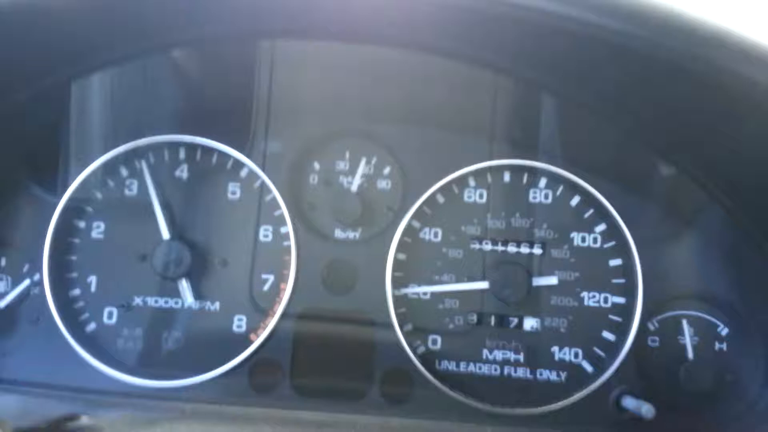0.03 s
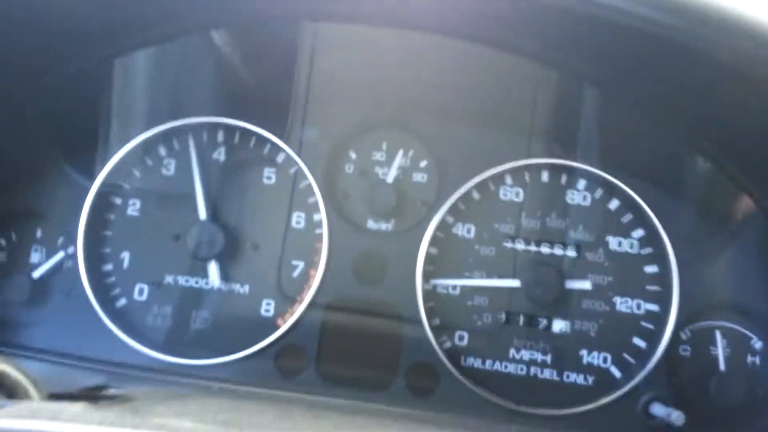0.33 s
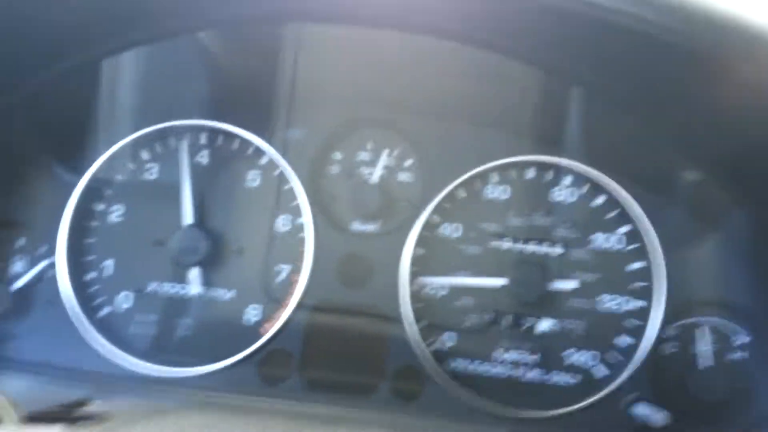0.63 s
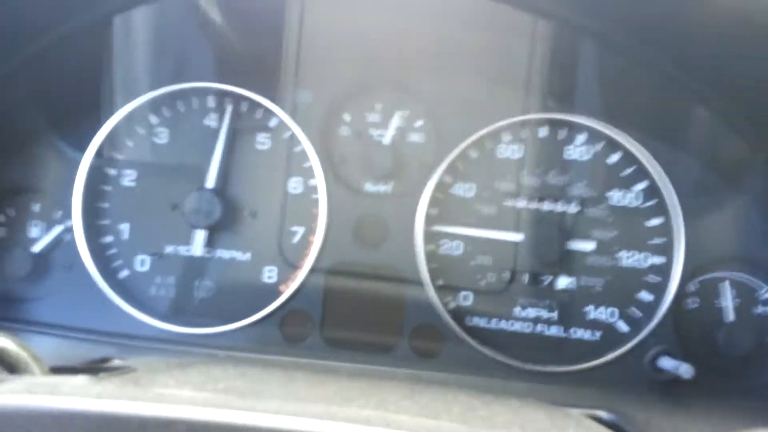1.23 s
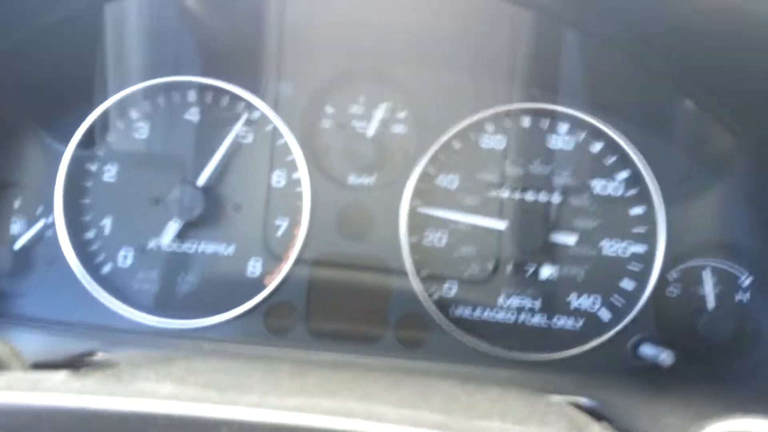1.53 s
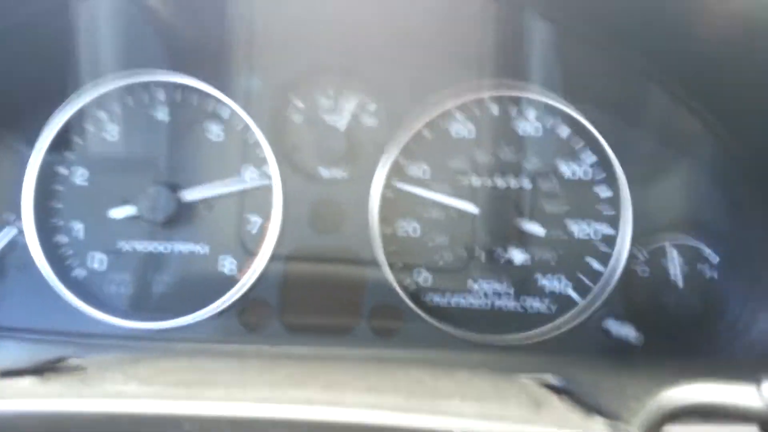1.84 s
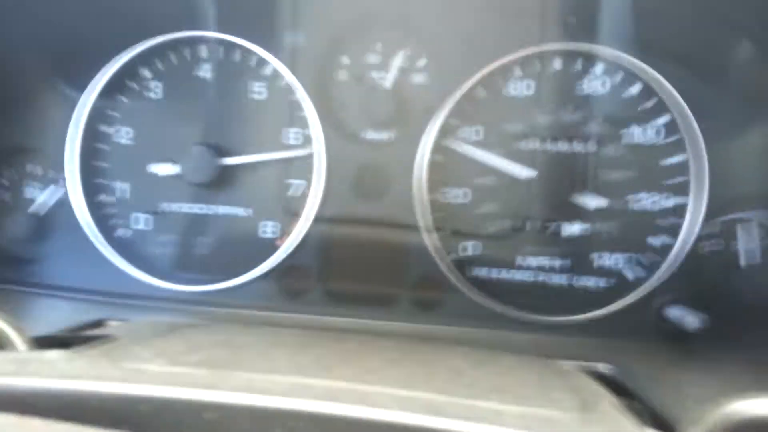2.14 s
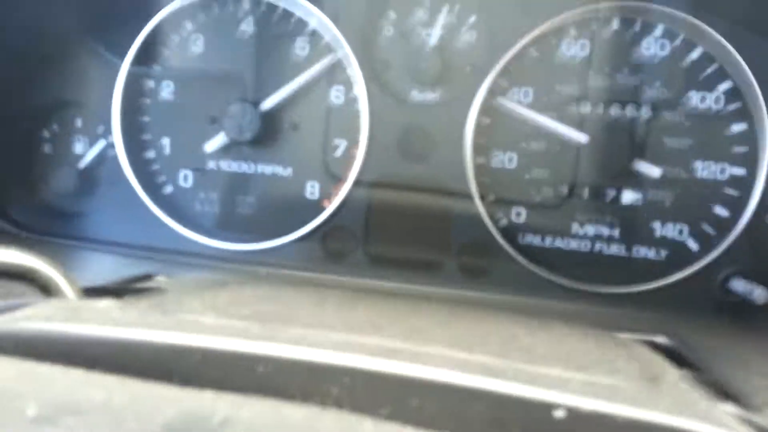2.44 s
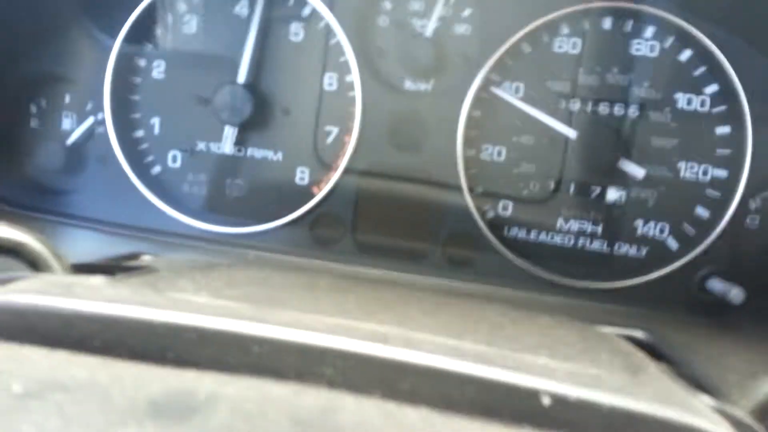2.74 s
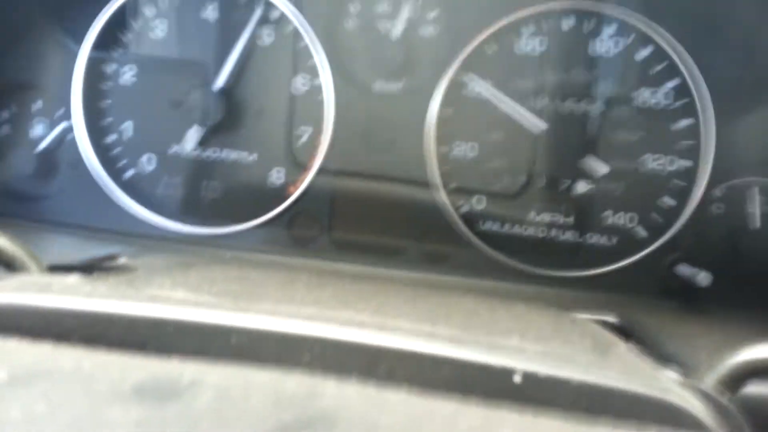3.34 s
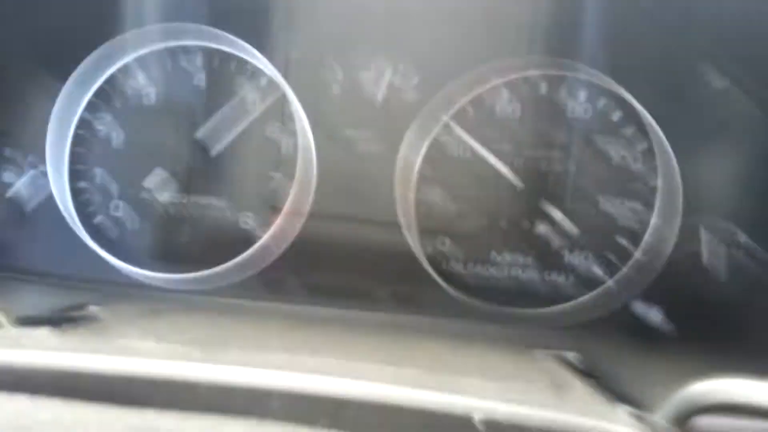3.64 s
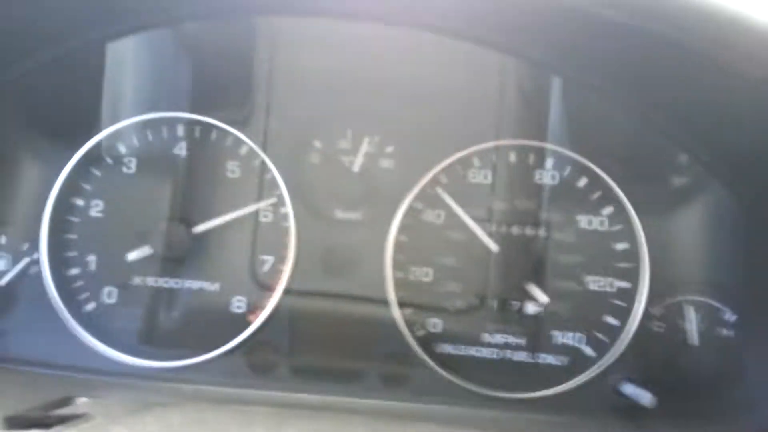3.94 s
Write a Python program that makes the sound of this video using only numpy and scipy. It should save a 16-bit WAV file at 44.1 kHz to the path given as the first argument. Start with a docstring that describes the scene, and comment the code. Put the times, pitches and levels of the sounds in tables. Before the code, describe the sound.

A turbocharged car engine accelerates hard, hisses through a gear change, then climbs again.

```python
"""A turbocharged four-cylinder car pulls hard through two gears, heard from the driver's seat.
The exhaust booms at the firing rate, its overtones growling through the cabin's resonances,
over a coarse roar of intake and engine bay. The turbo whistles upward in a rush of air.
At the gear change the blow-off valve hisses, the linkage knocks, the boom stutters and the revs
drop; a brief squeak comes with the next gear, and they climb again."""
import sys
import numpy as np
from scipy import signal
from scipy.fft import rfft, irfft
from scipy.io import wavfile
from scipy.ndimage import uniform_filter1d

SR = 44100
rng = np.random.default_rng(int(sys.argv[2]) if len(sys.argv) > 2 else 0)


def transcribe(signal):
    """Save signal, clipped to [-1, 1], as a 16-bit WAV file at the path in sys.argv[1]."""
    frames = np.atleast_2d(signal).T
    limited = np.clip(frames, -1, 1)
    pcm = np.round(limited * 32767).astype(np.int16)
    wavfile.write(sys.argv[1], SR, pcm)


N = 176400
T = np.arange(N) / SR
HZ = np.fft.rfftfreq(N, 1 / SR)

# The revs. Each row: time in seconds, firing rate in Hz.
REVS = [(.43, 117.5), (.7, 124.3), (1, 133.8), (1.25, 143.6), (1.45, 158.2), (1.65, 180.5), (1.87, 212),
        (2, 219.5), (2.12, 198.4), (2.22, 189.8), (2.4, 178.7), (2.51, 174.1), (2.6, 150), (2.72, 133.7),
        (2.87, 147.4), (2.98, 144.3), (3.2, 155.3), (3.32, 158.4), (3.5, 173.1), (3.7, 176), (3.82, 190),
        (4, 194.3)]
# Fader rides for the exhaust's boom, its octave and its growl. Each row: time in seconds, level in dB.
BOOM_FADER = [(0.43, -39), (0.46, -29), (0.54, -23), (0.69, -14), (1.36, -8.5), (1.62, -10), (1.67, -11),
              (1.7, -36), (1.75, -9), (1.77, -7.5), (1.94, -10), (2.09, -8), (2.12, -37.5), (2.16, -8.5),
              (2.4, -6), (2.51, -7), (2.57, -15.5), (2.65, -8), (2.68, -10.5), (3.34, -8.5), (3.72, -9.5),
              (3.8, -22.5), (3.86, -17), (3.89, -15), (3.93, -8), (3.96, -24), (4.0, -7.5)]
OCTAVE_FADER = [(.43, -34), (.53, -23), (.77, -14), (.83, -19), (.93, -14.5), (1.1, -22), (1.2, -15),
                (1.32, -20.5), (1.42, -15.5), (1.6, -20.5), (1.7, -23), (1.77, -18), (1.88, -35), (2, -24),
                (2.38, -27.5), (2.48, -20.5), (2.66, -17), (2.75, -20), (3.02, -18), (3.17, -14),
                (3.33, -18.5), (3.46, -23.5), (3.53, -20.5), (3.8, -22), (4, -23.5)]
GROWL_FADER = [(0.43, -48.5), (0.49, -29.5), (0.78, -17), (0.95, -19.5), (1.02, -16), (1.43, -22.5),
               (1.72, -16), (1.88, -29), (2.24, -21), (2.37, -30), (2.74, -17), (3.21, -23), (3.43, -20.5),
               (3.47, -21.5), (3.5, -21.5), (3.77, -21), (3.81, -15.5), (4.0, -18.5)]
# Strong exhaust overtones. Each entry: multiple of the firing rate, boost over the weak ones in dB.
STRONG_ORDERS = {.75: 5.3, 1.25: 7.3, 1.5: 5, 1.75: 4.4, 2.25: 2.3, 2.5: 6.95, 3: 9.7, 3.25: 3, 3.5: 9.5,
                 3.75: 4.6, 4: 8.8, 4.5: 2.8, 5: 8, 5.5: 3, 6: 6.7, 7: 9, 8: 5.4, 9: 4.6, 10: 5.6}
# The cabin's EQ on the growl. Each row: frequency in Hz, gain in dB.
CABIN_EQ = [(70, -17), (150, 1.5), (250, 2.5), (330, 0), (375, -1.5), (405, 3), (435, 4.5), (452, 2.5),
            (470, 9), (505, 6), (545, -5.5), (600, -5), (680, -5.5), (760, -5.5), (830, -7), (1200, -10.5),
            (2000, -17.5)]
# Fader rides for the roar. Each row: time in seconds, body level in dB, treble level in dB.
ROAR_FADERS = [(0.43, -49.5, -67), (0.47, -42.5, -57.5), (0.56, -30, -48), (0.71, -25.5, -42),
               (1.43, -27.5, -43.5), (1.69, -19.5, -37), (1.72, -17, -34), (1.8, -21.5, -39),
               (1.99, -18.5, -36.5), (2.11, -23.5, -32), (2.12, -16.5, -28.5), (2.16, -22, -33.5),
               (2.29, -23, -37), (2.48, -27, -40), (2.61, -20, -37.5), (2.69, -25.5, -42.5),
               (3.25, -25.5, -41.5), (4.0, -18, -33.5)]
# Cabin and panel resonances that colour the roar. Each row: centre in Hz, width in Hz, boost in dB.
PANELS = [(472, 50, 5), (1032, 28, 3), (1275, 17, 7), (1510, 10, 6), (1920, 38, 0.5), (3100, 34, 2),
          (3440, 23, 0), (3800, 77, 4)]
# Noise colours of the roar's body and treble, the car's rumble, the compressor's air and the valve.
# Each row: frequency in Hz, relative level in dB.
BODY_EQ = [(110, -21), (200, 2), (480, -2), (620, -6.5), (1000, -4.5), (1650, -6), (2100, -14.5),
           (3000, -26.5), (5000, -53.5)]
TREBLE_EQ = [(1200, -32), (2200, 1), (3000, 2.5), (3800, -3), (4800, -8), (6000, -15.5), (8500, -21),
             (11000, -31.5), (14500, -39.5)]
RUMBLE_EQ = [(10, -50.5), (25, -31.5), (35, -15.5), (52, 7), (75, 8.5), (110, 8.5), (200, 14), (400, -40.5)]
AIR_EQ = [(3000, -19), (6000, -4), (8500, 0), (11000, -2), (14500, -8)]
VALVE_EQ = [(800, -29), (2000, 6), (3300, 2), (5000, -0.5), (6800, -6), (8600, -0.5), (10300, -5.5),
            (12000, -12), (14300, -5)]
# The turbo's two whistles. Each row: time in seconds, lower pitch in Hz, lower and upper level in dB.
WHISTLES = [(.55, 4080, -75, -75), (.75, 4920, -68, -65), (1, 5630, -77, -60.5), (1.22, 6780, -67.5, -63),
            (1.36, 8300, -63.5, -59.5), (1.52, 10100, -57.5, -63.5), (1.7, 11630, -52.5, -66),
            (1.93, 12190, -58.5, -62), (2.05, 12040, -45, -67), (2.22, 11850, -43, -58),
            (2.42, 11120, -57, -73), (2.5, 8000, -80, -89), (2.6, 5548, -67, -65), (2.85, 7600, -63, -59),
            (3.08, 9600, -61, -57), (3.3, 11000, -58.5, -60.5), (3.6, 11510, -54.5, -64),
            (4, 11900, -52.5, -71)]
# Knocks and ticks. Each row: start in seconds, level in dB, centre in Hz, half-width in octaves,
# seconds to fall by 60 dB.
KNOCKS = [(.966, -38, 9000, 1, .035), (2.108, -28, 4000, .8, .06), (2.116, -17, 1400, .25, .06),
          (2.339, -14, 950, .3, .04), (2.57, -33, 4200, .75, .08), (3.553, -38, 5200, .75, .1)]
# Stereo image. Each row: frequency in Hz, left-right likeness (1 or more is mono).
LIKENESS = [(200, 1.1), (300, 0.53), (450, 0.63), (750, 0.78), (1300, -0.29), (2500, -0.05), (5000, 0),
            (14000, 0)]
# Lean of the microphone pair. Each row: frequency in Hz, left over right in dB.
BALANCE = [(200, -0.23), (320, 3), (490, .5), (740, -2), (1130, 3.5), (1710, 5.5), (2610, -3.5), (3960, -2),
           (6030, -8.5), (9160, -5), (13900, 0.5)]


def amp(db):
    """Decibels to gain."""
    return 10 ** (np.asarray(db) / 20)


def unit(x):
    """Scales to rms 1."""
    return x / np.sqrt(np.mean(x ** 2) + 1e-20)


def curve(table):
    """Every column of a time table at each sample."""
    times, *columns = np.transpose(table)
    return np.squeeze([np.interp(T, times, c) for c in columns])


def spectrum(table, hz=HZ):
    """A frequency table, interpolated on a log axis."""
    freqs, values = np.transpose(table)
    return np.interp(np.log(hz + 1), np.log(freqs + 1), values)


def wander(rate_hz):
    """Smooth random drift of rms 1."""
    knots = rng.standard_normal(N // 100 + 1)
    freqs = np.fft.rfftfreq(len(knots), 100 / SR)
    smooth = irfft(rfft(knots) / (1 + (freqs / rate_hz) ** 4), len(knots))
    return unit(np.interp(T, np.linspace(0, T[-1], len(knots)), smooth))


def stereo(a, b, hz, mono_below_hz=170):
    """Two unrelated signals become left and right, mono in the bass and wide in the treble."""
    likeness = np.where(hz < mono_below_hz, 1, np.clip(spectrum(LIKENESS, hz), -.95, 1))
    mid = a * np.sqrt((1 + likeness) / 2)
    side = b * np.sqrt((1 - likeness) / 2)
    return np.array([mid + side, mid - side])


def noise(colour_db):
    """Stereo noise of a given colour, with rms 1 in the middle."""
    a, b = rfft(rng.standard_normal((2, N)))
    x = irfft(stereo(a, b, HZ) * amp(colour_db), N)
    return x / x.mean(0).std()


def exhaust_boom(firings, waver_hz=8.2, trim_db=1.26):
    """The exhaust pulses as a clean, wavering tone at the firing rate, with its octave."""
    ear_phase = np.array([[-.06], [.06]])  # radians: the boom reaches the right side first
    boom = np.sin(2 * np.pi * firings + ear_phase) * (1 + .1 * wander(waver_hz))
    boom *= boom_stutter() * amp(curve(BOOM_FADER) + trim_db)
    octave = np.cos(4 * np.pi * firings) * (1 + .2 * wander(waver_hz))
    return np.sqrt(2) * (boom + octave * amp(curve(OCTAVE_FADER)))


def exhaust_growl(firing_hz, firings, waver_hz=8.2, core_hz=(380, 650), trim_db=-.5):
    """Quarter-order overtones sweep through the cabin's resonances as the revs move."""
    growl = np.zeros((2, N))
    grid_hz = np.geomspace(60, 2500, 110)
    for order in np.arange(2, 41) / 4:
        if order in (1, 2):  # the boom and its octave
            continue
        tone = np.exp(2j * np.pi * (order * firings + rng.random()))
        tone *= 1 + .35 * (wander(waver_hz) + 1j * wander(waver_hz))
        cabin_db = spectrum(CABIN_EQ, grid_hz) + rng.uniform(-1, 1, len(grid_hz))
        gain = amp(STRONG_ORDERS.get(order, 0) + np.interp(order * firing_hz, grid_hz, cabin_db))
        growl += gain * stereo(tone.real, tone.imag * rng.choice([-1, 1]), order * firing_hz.mean())
    # Hold the core band steady ahead of the fader.
    bandpass = signal.butter(2, core_hz, "bandpass", fs=SR, output="sos")
    core = signal.sosfiltfilt(bandpass, growl.mean(0))
    growl /= np.sqrt(uniform_filter1d(core ** 2, size=5000))
    return growl * amp(curve(GROWL_FADER) + trim_db)


def roar(firings, flutter_db=.5, treble_trim_db=-.5, rumble_trim_db=-18):
    """Gas noise puffs with each firing and each engine cycle, over the rumble of the car body."""
    body_db, treble_db = curve(ROAR_FADERS)
    panels_db = sum(db / (1 + (2 * (HZ - hz) / width) ** 2) for hz, width, db in PANELS)
    puffs = 1 + .082 * np.cos(2 * np.pi * firings) + .066 * np.cos(2 * np.pi * firings / 4)
    puffs *= amp(flutter_db * wander(40))
    body = noise(spectrum(BODY_EQ) + panels_db) * amp(body_db)
    treble = noise(spectrum(TREBLE_EQ) + panels_db) * amp(treble_db + treble_trim_db)
    rumble = noise(spectrum(RUMBLE_EQ)) * amp(.53 * body_db + rumble_trim_db)
    return puffs * (body + treble) + rumble


def turbo(upper_ratio=1.5, fuzz_width_hz=560, waver_db=3, air_over_whistle_db=1.5):
    """Two fuzzy whistles locked to the turbo shaft; the compressor's air swells with the lower one."""
    hz, lower_db, upper_db = curve(WHISTLES)
    phase = 2 * np.pi * np.cumsum(hz) / SR
    fuzz_filter = 1 / (1 + (2 * HZ / fuzz_width_hz) ** 2)
    out = noise(spectrum(AIR_EQ)) * amp(lower_db + air_over_whistle_db)
    for ratio, db in ((1, lower_db), (upper_ratio, upper_db)):
        fuzz = unit(irfft(rfft(rng.standard_normal((2, 2, N))) * fuzz_filter, N))
        whistle = fuzz[0] * np.cos(ratio * phase) + fuzz[1] * np.sin(ratio * phase)
        out += whistle * amp(db + waver_db * wander(15))
    return out


def knocks(attack_s=.0015):
    """Dull knocks of the linkage and ticks of the cabin trim, each a fast-dying band of noise."""
    out = np.zeros((2, N))
    for start, db, hz, octaves, t60 in KNOCKS:
        age = np.maximum(T - start, 0)
        colour_db = -20 * np.log10(1 + (np.log2((HZ + 1) / hz) / octaves) ** 4)
        out += noise(colour_db) * np.minimum(age / attack_s, 1) * amp(db - 60 * age / t60)
    return out


def blow_off(start_s=2.015, attack_s=.029, hold_s=.11, level_db=-33, fall_db_per_s=68):
    """The valve opens, holds, and its hiss dies as the boost drains."""
    age = T - start_s
    opening = np.clip(age / attack_s, 0, 1)
    drain_db = fall_db_per_s * np.maximum(age - hold_s, 0)
    return noise(spectrum(VALVE_EQ)) * opening * amp(level_db - drain_db)


def boom_stutter(start_s=2.2, length_s=.085, rate_hz=26.5):
    """Gain of the boom: it ducks out twice as the throttle closes."""
    age = T - start_s
    return 1 - np.sin(np.pi * rate_hz * age) ** 2 * (age > 0) * (age < length_s)


def squeak(start_s=2.596, length_s=.031, centre_hz=2010, rise_hz_per_s=1200, level_db=-21.5):
    """One nearly pure chirp that bends upward as the next gear is taken."""
    age = np.clip(T - start_s, 0, length_s)
    hz = centre_hz + rise_hz_per_s * (age - length_s / 2)
    hz *= 1 + .006 * wander(70)
    swell = np.sin(np.pi * age / length_s) ** 2
    return amp(level_db) * swell * np.sin(2 * np.pi * np.cumsum(hz) / SR)


def scene():
    """Slightly unsteady revs drive the exhaust and pulse the roar; the other layers sit on top."""
    firing_hz = curve(REVS) * (1 + .0022 * wander(22))
    firings = np.cumsum(firing_hz) / SR
    engine = exhaust_boom(firings) + exhaust_growl(firing_hz, firings) + roar(firings)
    return engine + turbo() + knocks() + blow_off() + squeak()


def record(dry, start_s=.424, fade_s=.005, lowpass_hz=14480):
    """Microphone colour, a fast fade-in from silence, soft overload and a steep top cut."""
    balance = amp(np.outer([.5, -.5], spectrum(BALANCE)))
    x = irfft(rfft(dry) * balance, N)
    x *= np.clip((T - start_s) / fade_s, 0, 1)
    x /= (1 + x ** 12) ** (1 / 12)  # rounds off the peaks
    lowpass = signal.firwin(511, lowpass_hz, window=("kaiser", 9), fs=SR)
    return signal.oaconvolve(x, lowpass[None], "same")


dry = scene()
out = record(dry)
transcribe(out)
```